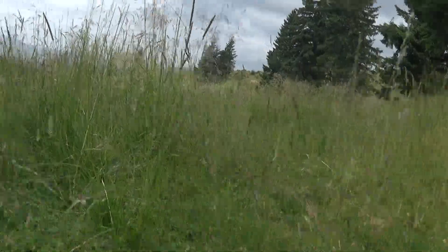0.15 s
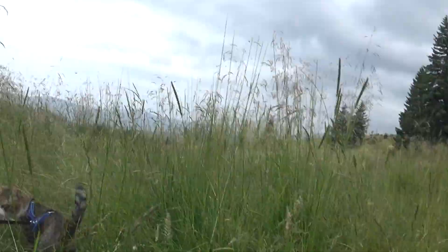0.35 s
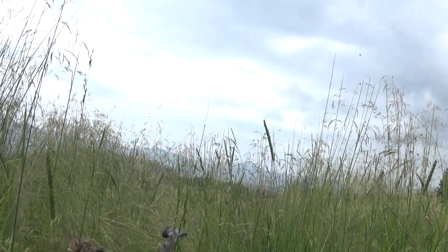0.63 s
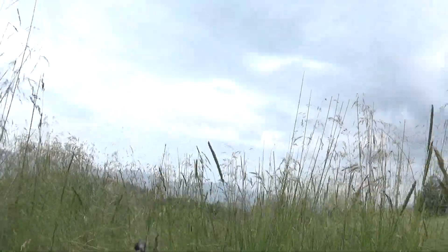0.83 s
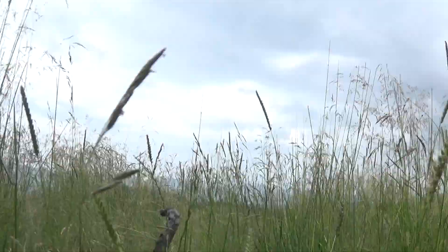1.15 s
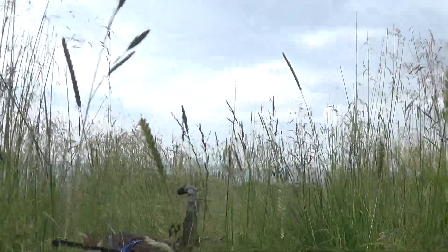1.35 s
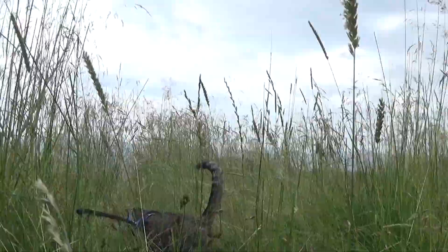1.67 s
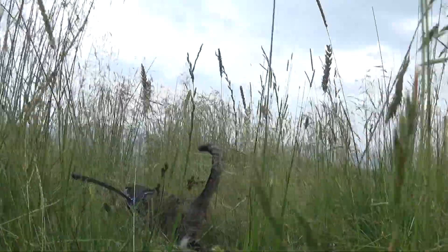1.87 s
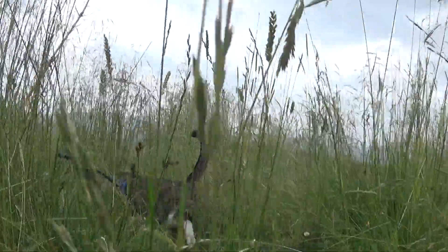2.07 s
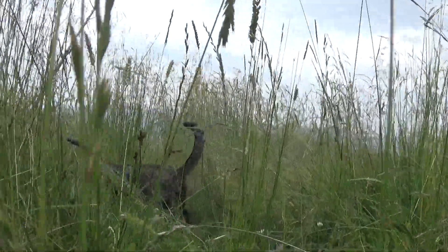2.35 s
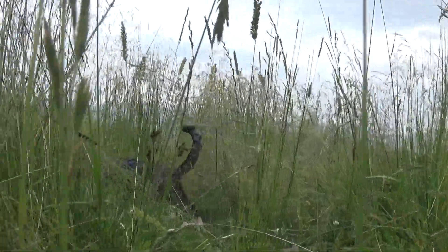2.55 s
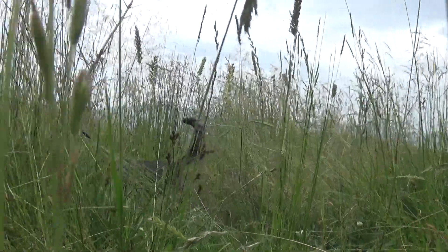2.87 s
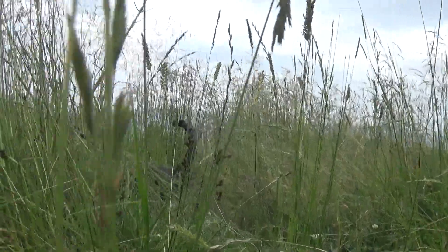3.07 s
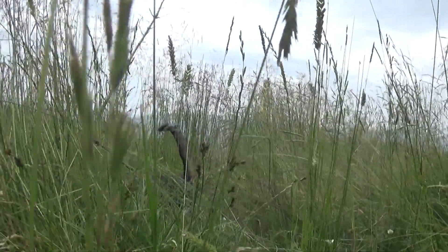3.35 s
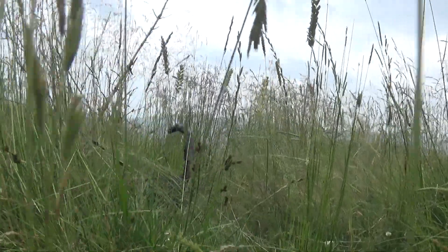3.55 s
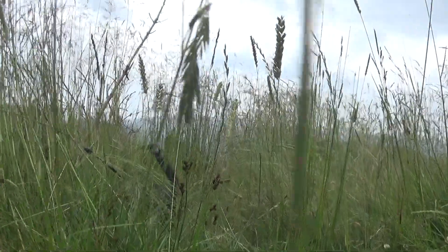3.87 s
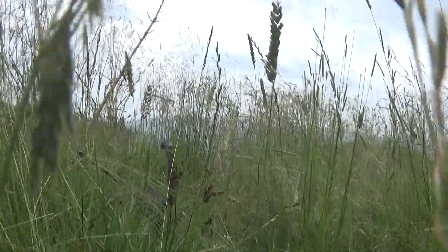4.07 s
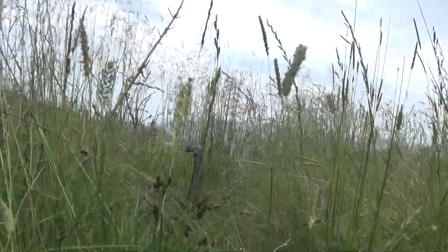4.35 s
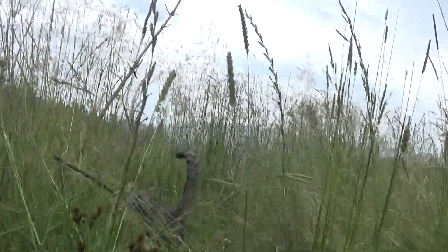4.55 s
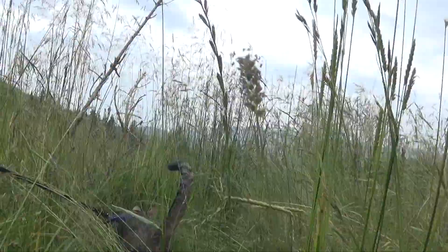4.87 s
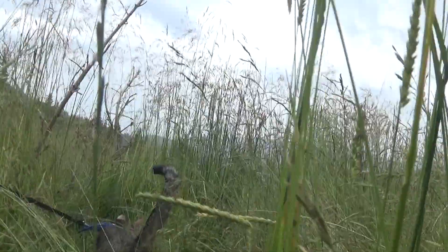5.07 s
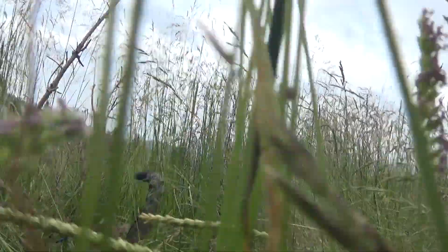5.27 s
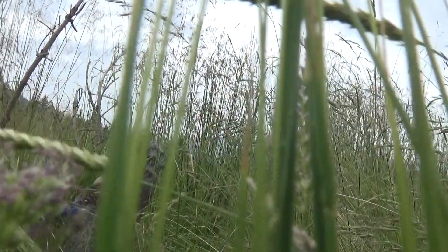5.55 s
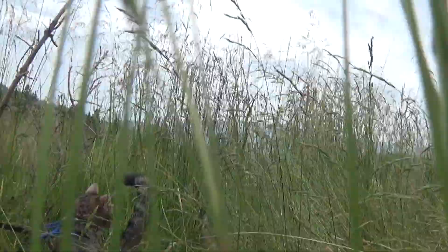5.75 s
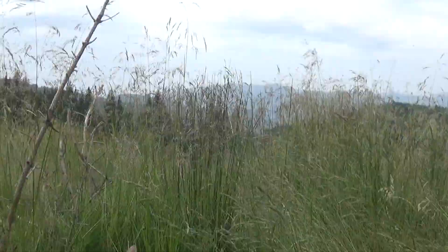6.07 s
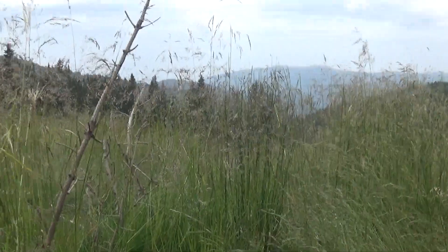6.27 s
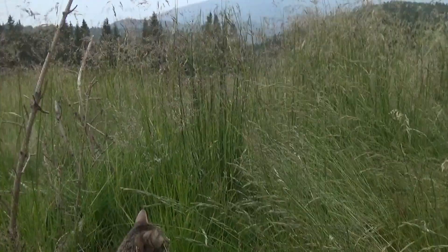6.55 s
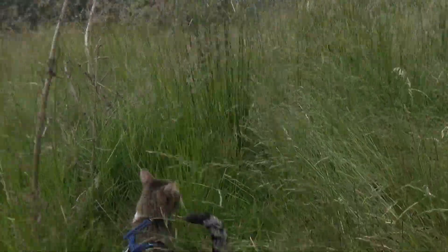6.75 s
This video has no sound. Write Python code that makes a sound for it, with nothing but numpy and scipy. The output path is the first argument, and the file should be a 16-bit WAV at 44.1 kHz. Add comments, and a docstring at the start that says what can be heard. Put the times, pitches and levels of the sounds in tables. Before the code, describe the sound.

A hand-held microphone pushes low through tall grass in an open meadow. A tuft rasps past over a low rumble, stalks crackle, then the rustling thins almost to nothing with faint squeaky rubbing. From about four seconds stems tap and scrape the casing sharply, building to a loud swish near six, followed by crunchy snaps and soft thuds underfoot. Very close, dry, no echo.

```python
"""First a tuft rasps past over a low rumble: a hand-held camera is pushed low through tall meadow grass.
Blades and stalks rub past at arm's length or less: noise shaped by many tiny catches and slips.
Stems and seed heads touch the casing, so short bursts and rubbing ring its wall, body and microphone grille.
Stalks snap underfoot as damped resonances, and feet land with dull thuds.
Two closely spaced microphone ports hear it in the open, with no echo, over a faint steady hush."""
import sys
import numpy as np
from scipy import signal
from scipy.fft import rfft, irfft, next_fast_len
from scipy.io import wavfile
from scipy.ndimage import uniform_filter1d

SR = 44100
rng = np.random.default_rng(int(sys.argv[2]) if len(sys.argv) > 2 else 0)


def persist_wave(psi):
    """Save psi, clipped to +-1, as 16-bit WAV."""
    counts = np.round(np.clip(psi, -1, 1) * 32767).astype(np.int16)
    wavfile.write(sys.argv[1], SR, np.atleast_2d(counts).T)


N = 305172
TIME = np.arange(N) / SR
TOP_HZ = 16000  # upper limit of the camera's sound


def undb(db):
    """Decibels to gain."""
    return 10 ** (np.asarray(db) / 20)


def unit(x):
    """Scale to rms 1."""
    return x / np.sqrt(np.mean(x ** 2))


def gains(points, n):
    """A colour as a gain on each frequency of an n-sample transform."""
    hz, db = np.transpose(points)
    frequencies = np.fft.rfftfreq(n, 1 / SR) + 1
    return undb(np.interp(np.log(frequencies), np.log(hz), db))


def colour(x, points):
    """Causal (minimum-phase) filter with the given colour: clicks keep their sharp front."""
    n = 2 * next_fast_len(x.shape[-1] // 2 + 1)
    cepstrum = irfft(np.log(gains(points, n)), n)
    # Folding the cepstrum onto positive times makes the filter causal.
    cepstrum[1:n // 2] *= 2
    cepstrum[n // 2 + 1:] = 0
    response = np.exp(rfft(cepstrum))
    return irfft(rfft(x, n) * response, n)[..., :x.shape[-1]]


def ring(x, modes):
    """Pass a sound through resonances (frequency [Hz], width [Hz], level [dB])."""
    n = next_fast_len(x.shape[-1])
    f = np.fft.rfftfreq(n, 1 / SR)
    response = 0
    for hz, width, db in modes:
        response = response + undb(db) * 1j * f * width / (hz ** 2 - f ** 2 + 1j * f * width)
    return irfft(rfft(x, n) * response, n)[..., :x.shape[-1]]


def walk(rate):
    """Slow random wandering with a spread near 1, through `rate` new values a second."""
    knots = rng.standard_normal(4096)
    return np.interp(TIME * rate, np.arange(len(knots)), knots)


def friction(rate, spread_db, t60, smooth, flutter_db):
    """Fibres catch and slip: tiny bursts of uneven size over a smooth rub, as a mid and a side signal."""
    caught = rng.random(N) < rate / SR  # about `rate` slips a second
    sizes = np.minimum(rng.exponential(size=N), 4)
    slips = caught * undb(spread_db * sizes) ** 2
    decay = np.exp(-2 * np.log(1000) / (t60 * SR))
    power = signal.lfilter([1], [1, -decay], slips)
    # Evening out the local mean leaves the grain but not slow swells.
    power /= uniform_filter1d(power, size=3000) + power.mean() / 10
    envelope = np.sqrt(np.abs(power) + smooth ** 2) * undb(flutter_db * walk(35))
    return envelope * rng.standard_normal((2, N))


def patchy(x, depth_db=2.5, change_hz=24):
    """Each stalk has its own colour, so every half octave swells and fades by itself."""
    n = next_fast_len(N)
    spectrum = rfft(x, n)
    half_octaves = 2 * np.log2(np.fft.rfftfreq(n, 1 / SR) + 1)
    out = 0
    for k in range(12, 29):
        band = np.clip(1 - np.abs(half_octaves - k), 0, 1)
        out = out + irfft(spectrum * band, n)[:, :N] * undb(depth_db * walk(change_hz))
    return out


def swells(events, share, shape):
    """Loudness of overlapping contacts (time of peak [s], length [s], level [dB]) that grow and fade."""
    t = TIME[::40]  # coarse steps are enough for a slow curve
    power = 0
    for s, length, db in events:
        away = np.abs(t - s) / (length * np.where(t < s, share, 1 - share))
        power = power + undb(db) ** 2 * np.exp(-2 * away ** shape)
    return np.interp(TIME, t, np.sqrt(power))


def burst(t60, rise, size=12000):
    """A short spray of fibre breaks that swells and dies away; t60 and rise in seconds."""
    t = np.arange(size) / SR
    envelope = (1 - np.exp(-t / rise)) * np.exp(-np.log(1000) * t / t60)
    return rng.standard_normal((2, size)) * envelope


def add(out, sound, s, db):
    """Mix an event in at its time and peak level."""
    start = max(int(s * SR), 0)
    peak = np.sort(np.abs(sound).ravel())[-8:].mean()  # mean of the eight largest samples
    out[:, start:start + sound.shape[1]] += (sound * undb(db) / peak)[:, :N - start]


# Colours of blade on blade, stalk on stalk and crushing underfoot: (frequency [Hz], gain [dB])
SWISH_COLOUR = [(1500,-34),(4000,-11),(6500,-6),(8500,-2.5),(10200,0.5),(11500,-3.5),(13000,-15),(16000,-35)]
RASP_COLOUR = [(500,-19),(1200,6),(2000,5),(3600,5.5),(5000,1),(7500,0),(14000,-9.5)]
CRUSH_COLOUR = [(25,-36),(120,-18),(250,-10),(430,0),(800,2.5),(1400,-5.5),(2300,-8),(6000,-26.5)]
# Pace, which slows, almost stops, then pushes on: (time [s], rustle level before layer offsets [dB])
PACE = [(0,-54.5),(.3,-50.5),(.65,-57.5),(1.45,-55.5),(1.7,-59.5),(2.25,-58.5),(2.8,-63),(3.4,-70.5),(3.62,-62.5),(4.0,-58),(4.3,-54.5),(4.47,-50),(4.66,-46),(4.9,-47),(5.0,-55),(5.3,-47),(5.7,-47.5),(6.25,-45.5),(6.47,-55),(6.91,-54.5)]
# Tufts sweeping past: (time at the fullest [s], length [s], blade level [dB], stalk level [dB])
TUFTS = [(.005,0.035,-40,-33),(0.2,0.044,-39.5,-46),(0.463,0.13,-38,-40.5),(1.09,0.21,-48.5,-63),(1.243,0.16,-46,-52),(1.639,0.024,-46.5,-92),(1.956,0.23,-41,-42.5),(2.964,0.25,-55.5,-62.5),(3.938,0.081,-42,-50),(4.087,0.17,-38.5,-39.5),(4.221,0.056,-37,-37.5),(4.841,0.03,-31.5,-38.5),(5.689,0.089,-36,-43.5),(5.924,0.097,-32.5,-35.5),(6.159,0.058,-26.5,-25),(6.538,0.023,-43,-35)]
# Grass flattened by a tread: (time at the fullest [s], length [s], level [dB])
TREADS = [(.49,0.11,-40),(.76,0.27,-47.5),(1.26,0.11,-47.5),(1.95,0.055,-39.5),(5.65,0.11,-43.5),(6.16,0.048,-31),(6.34,0.085,-40.5)]
SWISH_DB, RASP_DB, CRUSH_DB = 1.5, 1.5, -1.5  # offsets from the pace level
STROLL_DB, CRUSH_SLOPE = -49.5, 0.8  # crushing follows the pace less steeply about an easy stroll
SWELL_SHARE, SWELL_SHAPE = 0.48, 1  # part of the length spent growing; shape 1 is pointed, 2 rounded


def rustle():
    """Blades, stalks and trodden grass rub at the pace of the walk; tufts and treads swell over it."""
    swish = colour(friction(rate=360, spread_db=7.5, t60=0.015, smooth=1.0, flutter_db=2.0), SWISH_COLOUR)
    rasp = colour(friction(rate=130, spread_db=1.8, t60=0.02, smooth=1.0, flutter_db=1.5), RASP_COLOUR)
    crush = colour(friction(rate=110, spread_db=1.8, t60=0.02, smooth=1.0, flutter_db=1.2), CRUSH_COLOUR)
    pace_db = np.interp(TIME, *np.transpose(PACE))
    weight_db = STROLL_DB + CRUSH_SLOPE * (pace_db - STROLL_DB)
    blades = swells([(s, length, db) for s, length, db, _ in TUFTS], SWELL_SHARE, SWELL_SHAPE)
    stalks = swells([(s, length, db) for s, length, _, db in TUFTS], SWELL_SHARE, SWELL_SHAPE)
    treads = swells(TREADS, SWELL_SHARE, SWELL_SHAPE)
    # The steady and the swelling loudness add as powers.
    return (unit(swish) * np.hypot(undb(pace_db + SWISH_DB), blades)
            + unit(patchy(rasp)) * np.hypot(undb(pace_db + RASP_DB), stalks)
            + unit(patchy(crush)) * np.hypot(undb(weight_db + CRUSH_DB), treads))


# Single stalks brushed aside: (time at the fullest [s], peak level [dB], length [s], pitch [Hz])
BRUSHES = [(0.403,-28.5,.03,4000),(2.128,-32.5,0.045,2810),(3.782,-31,0.035,2300),(3.862,-33,0.023,2740)]


def brushes(width=0.46):
    """One stalk scrapes along another: a grainy swell around its own pitch (width as a share of it)."""
    out = np.zeros((2, N))
    for s, db, length, hz in BRUSHES:
        grain = np.repeat(rng.exponential(size=300), 40) ** .5
        t = (np.arange(len(grain)) - len(grain) / 2) / SR
        rub = rng.standard_normal((2, len(t))) * grain * np.exp(-2 * np.abs(t) / length)
        add(out, ring(rub, [(hz, hz * width, 0)]), s + t[0], db)
    return out


# The camera comes up through the grass tips: (time at the fullest [s], length [s], level [dB])
LIFT = (6.71,0.26,-48.5)
TIPS_HZ, TIPS_WIDTH_HZ = 9000, 2500


def lift():
    """Fine grass tips brush past with a thin, airy hiss as the camera is lifted clear."""
    tips = [(TIPS_HZ, TIPS_WIDTH_HZ, 0)]
    hiss = ring(ring(rng.standard_normal((2, N)), tips), tips)
    return unit(hiss) * swells([LIFT], SWELL_SHARE, 1.9)


def below_edge(x, edge_hz=12300):
    """The casing wall passes little above its highest mode."""
    return signal.sosfilt(signal.butter(4, edge_hz, fs=SR, output="sos"), x)


# Modes of the casing wall: (frequency [Hz], width [Hz], level before the touch varies it [dB])
CASING_MODES = [(990,50,-10),(1530,60,-2),(2450,110,-7),(3290,60,-10),(3500,80,-10),(4050,65,0),(4490,65,-4),(5190,130,-2.5),(5630,200,-3),(8330,200,-4),(9570,100,3),(9935,100,1),(10450,250,0),(11170,130,3)]


def casing(x):
    """The casing wall rings in its modes, in a random balance for the spot touched."""
    touched = [(hz, width, db + rng.standard_normal()) for hz, width, db in CASING_MODES]
    return below_edge(ring(x, touched))


# Stems that flick the casing: (time [s], peak level [dB], stem pitch [Hz], decay by 60 dB [s])
TAPS = [(0.129,-24,9300,0.051),(0.167,-28.5,10900,0.19),(1.787,-31,9500,0.049),(2.07,-35,7000,.012),(2.131,-29,3400,0.014),(2.181,-35,1910,0.01),(2.804,-40,9550,.01),(3.419,-41,9200,0.18),(3.911,-33,11000,0.011),(3.968,-27,4000,0.04),(4.046,-30,9400,0.012),(4.075,-19.5,4100,0.0086),(4.101,-17.5,9100,0.012),(4.109,-18,10400,.008),(4.212,-24,6100,0.043),(4.224,-18,9000,0.0089),(4.485,-14.5,9900,0.04),(4.53,-18,10700,0.0064),(4.633,-27,11100,.02),(5.078,-30.5,7040,0.02),(5.122,-22.5,8800,0.0097),(5.297,-22.5,8850,0.034),(5.627,-22,11400,0.068),(5.946,-16,5560,0.0074),(5.968,-8.5,10000,0.0088),(5.981,-15,2250,0.035),(6.022,-19,10900,0.1),(6.558,-21,4840,0.011)]
# Modes of the microphone grille: (frequency [Hz], width [Hz], relative level [dB])
GRILLE_MODES = [(11145,45,0),(11320,70,-6)]
# Colour of a sharp break or knock: (frequency [Hz], gain [dB])
CRACK_COLOUR = [(25,-31),(100,-35.5),(400,-16.5),(1200,-15),(4000,-20),(10000,-17),(16000,-27)]


def taps(stem_db=1, grille_db=6, crack_db=-12, stem_width=0.14):
    """A flicked stem rings briefly itself and sets casing and grille ringing."""
    out = np.zeros((2, N))
    for s, db, hz, t60 in TAPS:
        hit = burst(t60, rise=.0003)
        stem = ring(hit, [(hz, hz * stem_width, stem_db)])
        camera = casing(hit) + undb(grille_db) * ring(hit, GRILLE_MODES)
        crack = undb(crack_db) * colour(hit, CRACK_COLOUR)
        add(out, camera + stem + crack, s, db)
    return out


# Seed heads dragged over the casing:
# (time of letting go [s], peak level [dB], length [s], squeak pitch [Hz], squeak over scrape [dB])
DRAGS = [(0.071,-27.5,0.0042,10400,0),(2.036,-31,0.029,3480,0),(2.044,-26,0.045,4470,-2.5),(2.256,-38.5,0.034,5470,-6),(2.46,-23.5,0.029,9630,2.5),(4.095,-25.5,0.044,4000,2.5),(4.516,-13,.009,10570,1.5),(4.585,-22,0.0057,5420,5),(4.68,-21,0.023,1780,-12),(5.178,-20.5,0.012,10400,-2)]


def drags(squeak_width_hz=170, glide=0.057, crack_db=-5):
    """A seed head rubs harder as its stem bends, and squeaks a little higher until it lets go."""
    out = np.zeros((2, N))
    t = np.arange(SR // 6) / SR
    low = signal.butter(2, squeak_width_hz, fs=SR, output="sos")
    for s, db, length, hz, squeak_db in DRAGS:
        bend = t / length  # reaches 1 at the release
        force = np.sqrt(bend) / (1 + bend ** 20)
        rub = rng.standard_normal((2, len(t))) * force
        unsteady = signal.sosfilt(low, rng.standard_normal((2, len(t))))
        pitch = hz * (1 + glide * (bend - .5))
        squeak = force * unsteady * np.sin(2 * np.pi * np.cumsum(pitch) / SR)
        scrape = casing(rub) + undb(crack_db) * colour(rub, CRACK_COLOUR)
        add(out, unit(scrape) + undb(squeak_db) * unit(squeak), s - length, db)
    return out


# Seed heads sliding along the wall: (time at the hardest [s], length [s], level [dB])
SLIDES = [(2.03,0.31,-58),(2.41,0.046,-47.5),(2.66,0.11,-52.5),(2.96,0.15,-55),(3.17,0.26,-51.5),(3.43,0.07,-55),(3.79,0.23,-47.5),(4.14,0.19,-41),(4.41,0.2,-41.5),(4.88,0.24,-43.5),(5.6,0.58,-46),(5.94,0.35,-33),(6.22,0.064,-37)]
# Stems resting while the camera is almost still: (time at the fullest [s], length [s], level [dB])
REST = (2.7, 1.8, -63)
# The one mode they keep singing: (frequency [Hz], width [Hz], level [dB])
REST_MODE = (9570, 90, 0)
PRESS_SHARE, PRESS_SHAPE = .68, 1.5  # a stem bends slowly and slips off quickly


def slide():
    """A seed head slips along the wall in uneven pulses; resting stems keep one thin mode singing."""
    pulses = undb(4.5 * np.sin(2 * np.pi * (23 * TIME + .5 * walk(12))))  # about 23 a second
    rub = friction(rate=500, spread_db=2.5, t60=.003, smooth=0.5, flutter_db=2)
    sliding = unit(patchy(casing(rub * pulses))) * swells(SLIDES, PRESS_SHARE, PRESS_SHAPE)
    resting = unit(ring(rub, [REST_MODE])) * swells([REST], 0.42, 1.8)
    return sliding + resting


# Modes of the hollow body: (frequency [Hz], width [Hz], relative level [dB])
BODY_MODES = [(419,16,0),(806,40,-9),(1200,60,-19),(1560,60,-17)]
# Stems bent against the camera: (time at the hardest [s], length [s], body hum [dB], grille ring [dB])
LEANS = [(0.74,0.084,-54,-62),(2.007,0.1,-80,-37),(2.678,0.29,-58.5,-61),(4.4,0.091,-60,-37),(4.887,0.64,-59.5,-55),(5.616,0.45,-48,-44),(5.848,0.061,-37,-40),(5.94,0.15,-40.5,-27.5),(6.03,0.063,-52,-28),(6.193,0.19,-70,-30)]


def body(waver_db=1.5, slide_db=-9):
    """Leaning stems make the hollow body hum and the grille ring; sliding seed heads stir the grille too."""
    on_body = swells([(s, length, db) for s, length, db, _ in LEANS], PRESS_SHARE, PRESS_SHAPE)
    on_grille = swells([(s, length, db) for s, length, _, db in LEANS], PRESS_SHARE, PRESS_SHAPE)
    rub = friction(rate=260, spread_db=2.2, t60=.006, smooth=.35, flutter_db=1.5)
    hum = unit(ring(rub, BODY_MODES)) * on_body * undb(waver_db * walk(20))
    on_grille = np.hypot(on_grille, undb(slide_db) * swells(SLIDES, PRESS_SHARE, PRESS_SHAPE))
    return hum + unit(ring(rub, GRILLE_MODES)) * on_grille


# Stalks that snap: (time [s], peak level [dB], pitch [Hz], decay by 60 dB [s])
SNAPS = [(.282,-29.5,3070,0.054),(0.315,-27.5,3830,0.055),(0.393,-23.5,3730,0.01),(0.441,-19,1670,0.014),(.445,-23,1980,0.03),(.477,-26,7000,.004),(0.549,-25,2300,0.026),(0.691,-36.5,780,0.041),(0.749,-36,770,0.035),(.768,-37,680,0.022),(.843,-34.5,1900,.008),(1.066,-28.5,3020,0.0095),(1.472,-36.5,553,0.18),(1.821,-31,3350,0.026),(3.186,-39,890,0.05),(4.582,-27.5,990,0.058),(4.622,-25.5,3190,0.0085),(4.713,-28.5,1750,0.0072),(4.721,-26,3400,0.006),(4.752,-16,4540,0.017),(4.773,-26,1590,.015),(4.921,-22,8400,0.01),(5.079,-35,690,0.11),(5.213,-23.5,2750,0.055),(5.245,-24.5,1290,0.044),(5.838,-23,490,0.068),(6.141,-12.5,1070,0.063),(6.246,-19.5,2210,0.041),(6.278,-27.5,2000,0.017),(6.327,-18,1100,0.033),(6.362,-25.5,870,0.047),(6.409,-13.5,2540,0.019),(6.439,-18,2930,0.011),(6.502,-22,1370,0.026),(6.538,-23.5,5000,0.012),(6.559,-16.5,660,0.044),(6.656,-27,1320,0.03),(6.764,-31.5,1210,0.053)]


def snaps(body_db=8, body_width=0.77, crack_share=0.46, edge_ratio=4.9, click=3):
    """A breaking stalk clicks and cracks over one damped resonance; thick, low stalks crack duller."""
    out = np.zeros((2, N))
    for s, db, hz, t60 in SNAPS:
        sprays = [burst(decay, rise=.0003) for decay in (t60 * crack_share, t60)]
        clicked = [spray + click * signal.unit_impulse(spray.shape) for spray in sprays]
        crack, fibres = [colour(spray, CRACK_COLOUR) for spray in clicked]
        stalk = ring(fibres, [(hz, hz * body_width, body_db)])
        dull = signal.butter(2, min(hz * edge_ratio, TOP_HZ), fs=SR, output="sos")
        add(out, signal.sosfilt(dull, crack + stalk), s, db)
    return out


# Soft footfalls: (time [s], peak level [dB], pitch [Hz], decay by 60 dB [s])
STEPS = [(0.322,-33,203,0.1),(4.383,-43,280,0.11),(4.604,-46,236,0.046),(6.15,-36.5,353,0.16),(6.56,-26,430,0.023)]


def steps(width=0.76):
    """A foot settles on soft turf with a dull thud: a burst through the same wide resonance twice."""
    out = np.zeros((2, N))
    for s, db, hz, t60 in STEPS:
        turf = [(hz, hz * width, 0)]
        add(out, ring(ring(burst(t60, rise=0.0089), turf), turf), s, db)
    return out


# Colour of the open meadow's hush: (frequency [Hz], gain [dB])
AIR_COLOUR = [(25,-42),(50,-3.5),(85,4),(130,-5),(250,-2),(450,2.5),(900,-16),(2000,1.5),(6000,-9),(10000,4.5),(16000,-81)]


def air(hush_db=-64, rumble_db=-58, settle_s=0.44):
    """The hush of the meadow, and a low rumble while the camera is swung down."""
    hush = unit(colour(rng.standard_normal((2, N)), AIR_COLOUR)) * undb(hush_db + 0.2 * walk(0.79))
    low_colour = [(25, -11), (90, 5.0), (200, 0), (500, -7), (2000, -29)]
    rumble = unit(colour(rng.standard_normal((2, N)), low_colour))
    swing = np.interp(TIME, [0, settle_s - .1, settle_s + 0.17], [.4, 1, 0])
    return hush + rumble * swing * undb(rumble_db)


# Width of the sound at the two microphone ports: (frequency [Hz], gain of the side signal [dB])
PORT_WIDTH = [(50,-17),(250,-11),(600,-9.5),(2000,-4),(4500,-6.5),(8000,-7),(11500,-17.5)]


def scene():
    """All sources at two closely spaced microphone ports."""
    grass = rustle() + brushes() + lift()
    touches = slide() + body() + taps() + drags()
    mid, side = grass + touches + snaps() + steps() + air()
    side = colour(side, PORT_WIDTH)
    return np.array([mid + side, mid - side])


def record(dry):
    """The camera cuts the top of the treble with a steep low-pass."""
    return signal.sosfilt(signal.ellip(10, .2, 80, TOP_HZ, fs=SR, output="sos"), dry)


dry = scene()
out = record(dry)
persist_wave(out)
```